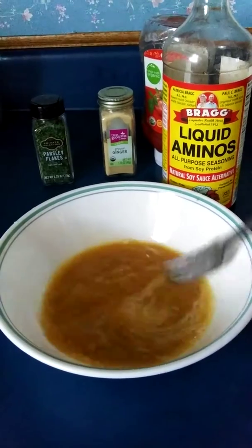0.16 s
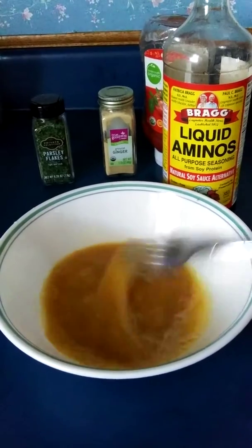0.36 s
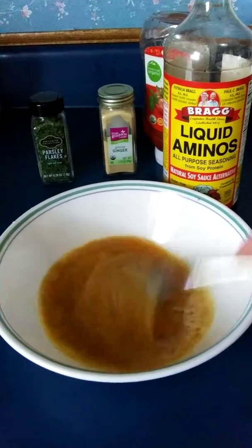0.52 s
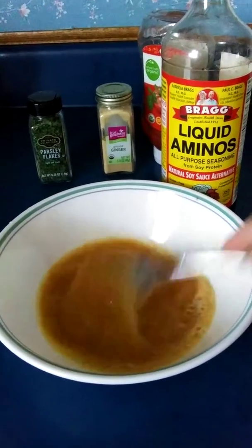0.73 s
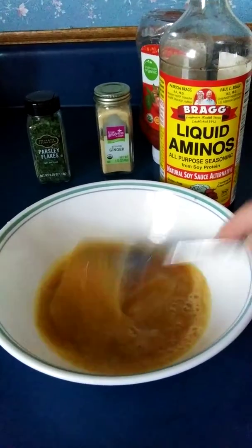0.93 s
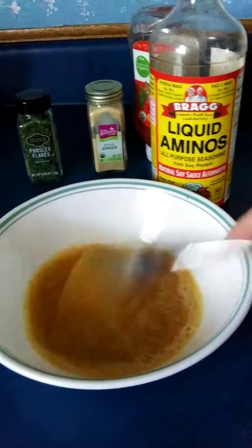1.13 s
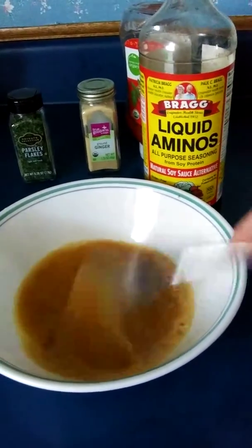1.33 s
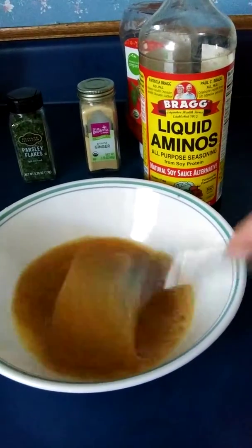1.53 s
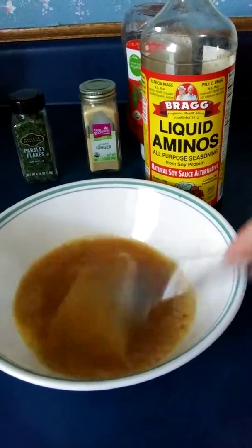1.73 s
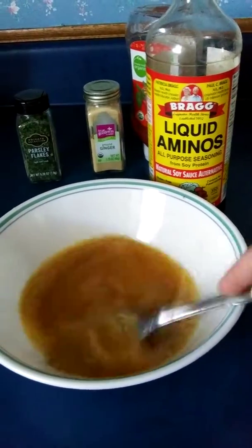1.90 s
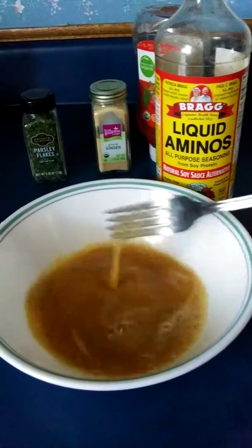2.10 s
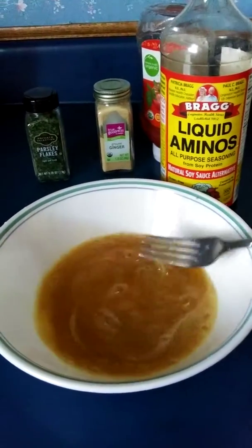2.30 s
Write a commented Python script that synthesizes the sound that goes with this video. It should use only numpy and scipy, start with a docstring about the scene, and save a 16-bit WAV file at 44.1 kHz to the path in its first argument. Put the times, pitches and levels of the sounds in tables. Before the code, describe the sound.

A steel fork beats eggs in a glass bowl, starting at about 0.2 seconds and striking five times a second. Each stroke is a bright clink with a short, slightly squeaky scrape and a light knock of the bowl on the counter. The egg sloshes faintly between strokes, with a few tiny plops. The last clink comes near 1.8 seconds, leaving quiet kitchen background after 2 seconds.

```python
"""Over a quiet kitchen background, a steel fork beats eggs in a glass bowl, five strokes a second.
The tines scrape over the glass and clink on it: glass and steel ring, and the bowl thumps the counter.
The tines chatter as they stick and slip, and touch the glass lightly around the strikes.
The egg sloshes back after each clink, a few bubbles plop, and once it gives a soft wet tick.
The small room adds a short tail."""
import sys
import numpy as np
from scipy import signal
from scipy.fft import rfft, irfft
from scipy.io import wavfile
from scipy.ndimage import map_coordinates

SR = 44100
rng = np.random.default_rng(int(sys.argv[2]) if len(sys.argv) > 2 else 0)


def unload_wav(signal):
    """Save mono or channel-first audio to the path in sys.argv[1] as 16-bit WAV at rate SR, clipped to [-1, 1]."""
    wavfile.write(
        sys.argv[1],
        SR,
        np.round(np.clip(np.atleast_2d(signal).T, -1, 1) * 32767).astype(np.int16),
    )


N = 103635

# Room background spectrum. Each row: frequency in Hz, level in dB.
BACKGROUND_SPECTRUM = [(100, -43.5), (190, -23.5), (236, -2.5), (335, -11), (416, -3), (734, -6),
                       (1790, -19.5), (5880, -26), (16000, -32)]
# Tine drags, and one soft wet tick of the egg at 1.796 s.
# Each row: start in seconds, length in seconds, level in dB, tilt in dB per octave.
SCRAPES = [(0.206, 0.085, -39, -1), (0.426, 0.061, -33.5, -1.5), (0.545, 0.022, -47.5, -5.5),
           (0.633, 0.041, -33, -2), (0.821, 0.045, -35, -2), (1.023, 0.039, -38, 0),
           (1.207, 0.082, -37.5, 0.5), (1.42, 0.05, -37, -2.5), (1.63, 0.085, -38.5, 0),
           (1.796, 0.0026, -47, -3), (1.827, 0.091, -36.5, -1.5)]
# Spectrum of steel rubbing glass. Each row: frequency in Hz, level in dB.
RASP_SPECTRUM = [(200, -41.5), (750, -12), (1150, 2.5), (2600, -4), (3900, -8.5), (6200, 1), (7400, 1.5),
                 (8800, -8), (10100, -4), (10800, -10), (11700, -2), (12800, -9.5), (16000, -12)]
# Fork strikes. Each row: start in seconds, ring level in dB, place (0 bottom, 1 slope, 2 low wall,
# 3 high wall), crack level in dB, crack tilt in dB per octave, thump level in dB.
CLINKS = [(0.2068, -25, 1.36, -25, 5.5, -35), (0.4205, -13, 0, -11.5, 0.5, -23.5),
          (.618, -17, 1.5, -16, 1, -24.5), (0.8149, -19, 3, -13, -2, -24.5), (1.015, -23.5, 2, -19, 1, -28),
          (1.206, -19, 0.72, -12.5, -1, -26.5), (1.4188, -20, 0.5, -14, 0, -28),
          (1.625, -16.5, 1.18, -15.5, 0.5, -27), (1.8312, -19, 1, -16, 4.5, -27.5)]
# Ringing modes of bowl and fork: glass below 5 kHz, steel tines above.
# Each row: frequency in Hz, T60 in seconds, level in dB at places 0 to 3.
CLINK_MODES = [(1000, 0.086, -15, -16.5, -26, -30.5), (1136, 0.065, -11, -8.5, -15.5, -21),
               (1238.3, .08, -20.5, -10.5, -3, -5.5), (1330.5, 0.041, -24.5, -5.5, -9, -7),
               (1567, 0.1, -13.5, -18.5, -7, -22.5), (2023, 0.073, -9.5, -16, -14, -37),
               (2132, 0.1, -19.5, -9, -23.5, -18), (2320, 0.037, -10, -13, -9, -31.5),
               (2507, 0.06, -3.5, -3.5, -15.5, -13.5), (2636, 0.044, 3, -5.5, -1, -16),
               (2862, 0.041, -8.5, -22, -8, -7.5), (3236, 0.06, -9.5, -11, -18.5, -16),
               (3470, 0.034, 2.5, -13, -1, -17), (3620, 0.052, -3, -34.5, -16.5, -31.5),
               (4614, .03, -21.5, -10, -2.5, -32), (5933, 0.0076, 8, 8, -10.5, 7.5),
               (6180, 0.018, -3.5, 2.5, 5.5, 3.5), (6730, 0.038, -17, -14, -11.5, -6.5),
               (7165, 0.045, -11.5, -2.5, -15, 6), (7810, 0.094, -12, -32, 1, -21)]
# Tine crack. Each row: frequency in Hz, level in dB on bottom and slope, level in dB on the high wall.
CRACK_SPECTRA = [(178.6, -44, -34), (800, -21, -19), (1180, -13, -14), (2670, -3.5, -12.5),
                 (3900, -5, -2.5), (4510, -2.5, -0.5), (5400, -6.5, -2), (6030, 8.5, -4.5), (6590, -1.5, 6),
                 (6850, -12, 1), (8600, -8.5, -11), (10600, -13, -12.5), (11100, -18.5, -17),
                 (12160, -3, -4), (12440, -16, -11.5), (16000, -10.5, -24.5)]
# Bowl on the counter. Each row: frequency in Hz, T60 in seconds, level in dB.
THUMP_MODES = [(386.7, 0.054, 0), (419.3, 0.038, -8)]
# Stick-slip bursts. Each row: start in seconds, length in seconds, pitch in Hz, level in dB.
CHATTERS = [(0.213, 0.045, 6090, -35.5), (0.2735, 0.0043, 6570, -29), (0.283, 0.0028, 6500, -33),
            (1.279, 0.0058, 5870, -34), (1.479, 0.012, 6300, -40.5), (1.686, 0.015, 5684, -33),
            (1.893, 0.0092, 6390, -33), (1.905, 0.0078, 5830, -33)]
# Light tine contacts. Each row: start in seconds, level in dB.
TOUCHES = [(0.2754, -32.5), (.415, -34), (.604, -35), (0.606, -28.5), (1.002, -37.5), (1.007, -38),
           (1.2, -34), (1.2773, -37.5), (1.4096, -27.5), (1.4833, -33.5), (1.601, -45), (1.6173, -36),
           (1.6185, -30.5), (1.6832, -36), (1.8208, -27.5)]
# Spectrum of moving egg. Each row: frequency in Hz, level in dB.
EGG_SPECTRUM = [(30, -47), (500, -1.5), (1000, 0), (2000, -11.5), (15000, -31)]
# Egg bubbles. Each row: start in seconds, level in dB, starting pitch in Hz.
PLOPS = [(0.554, -42.5, 1160), (.729, -47, 1110), (1.772, -41, 820), (1.79, -43.5, 610), (2.036, -45, 1557)]
# Room tail decay. Each row: frequency in Hz, T60 in seconds.
ROOM_DECAY = [(100, 0.24), (400, 0.44), (1200, 0.26), (7000, 0.29), (15000, 0.14)]
# Room tail spectrum. Each row: frequency in Hz, level in dB.
ROOM_SPECTRUM = [(100, -6), (400, -1), (3000, 0), (7000, -6), (15000, 1.5)]

BACKGROUND_DB = -59.5
SCRAPE_FADE_DB_PER_S, SNAGS_PER_S, SNAG_DB = 58, 150, 19.5
PATCH_DB, PATCH_HZ, PATCH_S = 6, 352.8, 0.02  # depth, width and life of the rasp's resonances
SQUEAK_HZ, SQUEAK_DB, SQUEAK_WANDER_FRACTION = 6130, -11, 0.054
DETUNE_FRACTIONS = (0.003, 0.008)  # glass, steel
CRACK_T60_S, BUZZ_T60_S, BUZZ_DB = 0.0062, 0.061, -8.5
SLOSH_DB, SLOSH_LAG_S, SLOSH_WIDTH_S = -64.5, 0.13, 0.023
PLOP_T60_S, PLOP_RISE_PER_S = 0.057, 1.2
WET_DB, WALL_DELAY_S = -10, 0.005
LOWPASS_HZ = 15880
T = np.arange(SR // 4) / SR  # seconds within one event


def amp(db):
    """Decibels to gain."""
    return 10 ** (np.asarray(db) / 20)


def unit(x):
    """Scale to rms 1."""
    return x / np.sqrt(np.mean(x ** 2) + 1e-20)


def along(points, hz):
    """Interpolate (Hz, value) points on a log axis."""
    point_hz, values = np.transpose(points)
    return np.interp(np.log(hz + 1), np.log(point_hz + 1), values)


def rise(attack_s):
    """Exponential onset."""
    return 1 - np.exp(-T / attack_s)


def fade(t60_s):
    """Exponential decay."""
    return np.exp(-np.log(1000) * T / t60_s)


def gate(length_s, attack_s, release_s):
    """Attack, hold and release."""
    return rise(attack_s) * np.exp(-np.maximum(T - length_s, 0) / release_s)


def wobble(knots_per_s, size=len(T)):
    """Smooth random curve."""
    return map_coordinates(rng.standard_normal(4096), [np.arange(size) * knots_per_s / SR], mode="wrap")


def bin_gains(size, spectrum, tilt_db_oct):
    """FFT gains of a spectrum, tilted above about 1 kHz."""
    hz = np.fft.rfftfreq(size, 1 / SR)
    return amp(along(spectrum, hz) + tilt_db_oct * np.log2(1 + hz / 1000))


def colour(x, spectrum, tilt_db_oct=0):
    """Zero-phase filter, output at rms 1."""
    return unit(irfft(rfft(x) * bin_gains(len(x), spectrum, tilt_db_oct), len(x)))


def causal_colour(x, spectrum, tilt_db_oct):
    """Minimum-phase filter, output at rms 1."""
    size = len(x)
    cepstrum = irfft(np.log(unit(bin_gains(size, spectrum, tilt_db_oct))), size)
    cepstrum[1:size // 2] *= 2
    cepstrum[size // 2:] = 0
    return unit(irfft(rfft(x) * np.exp(rfft(cepstrum)), size))


def add(out, start_s, x):
    """Mix x into out."""
    i = max(round(start_s * SR), 0)
    out[i:i + len(x)] += x[:max(N - i, 0)]


def background():
    """Steady low room noise."""
    return amp(BACKGROUND_DB) * colour(rng.standard_normal(N), BACKGROUND_SPECTRUM)


def moving_contact(x):
    """Narrow treble resonances shift at random as the contact point moves."""
    hz, t, bins = signal.stft(x, SR, nperseg=256)
    grid = np.meshgrid(hz / PATCH_HZ, t / PATCH_S, indexing="ij")
    patches = np.tanh(map_coordinates(rng.standard_normal((256, 256)), grid, mode="wrap"))
    depth_db = PATCH_DB * np.minimum(hz / 5000, 1)[:, None]
    return unit(signal.istft(bins * amp(depth_db * patches), nperseg=256)[1][:len(x)])


def squeak():
    """A tine sings in brief, wandering bursts, with its octave."""
    hz = SQUEAK_HZ * (1 + SQUEAK_WANDER_FRACTION * np.tanh(wobble(70)))
    phase = 2 * np.pi * np.cumsum(hz) / SR
    bursts = np.clip(wobble(160.7), 0, 1)
    return unit(bursts * (np.sin(phase) + np.sin(2 * phase) / 2))


def scrapes():
    """Tines drag over the glass in uneven slips and snags; the shortest burst is the egg's wet tick."""
    out = np.zeros(N)
    for start_s, length_s, db, tilt_db_oct in SCRAPES:
        snags = amp(SNAG_DB) * (rng.random(len(T)) < SNAGS_PER_S / SR)
        friction = moving_contact(rng.standard_normal(len(T)) + snags)
        slips = amp(5.5 * np.tanh(wobble(600)))
        rasp = colour(friction * slips, RASP_SPECTRUM, tilt_db_oct)
        pressure = amp(db - SCRAPE_FADE_DB_PER_S * T) * gate(length_s, attack_s=0.0019, release_s=0.013)
        add(out, start_s, kitchen(pressure * (rasp + amp(SQUEAK_DB) * squeak())))
    return out


def clink_ring(place, scatter_db=2.5):
    """Glass and tine modes, weighted by strike place; moving egg and grip detune them on each blow."""
    out = np.zeros(len(T))
    for k, (hz, t60_s, *place_db) in enumerate(CLINK_MODES):
        db = np.interp(place, np.arange(len(place_db)), place_db) + scatter_db * rng.normal()
        detune = 1 + DETUNE_FRACTIONS[int(hz > 5000)] * rng.normal()
        out += (-1) ** k * amp(db) * fade(t60_s) * np.sin(2 * np.pi * hz * detune * T)
    return out


def crack(place, tilt_db_oct):
    """Bright snap of steel on glass, then a short tine buzz."""
    wall_share = np.clip((place - 1) / 2, 0, 1)
    spectrum = [(hz, db + wall_share * (wall_db - db)) for hz, db, wall_db in CRACK_SPECTRA]
    envelope = fade(CRACK_T60_S) + amp(BUZZ_DB) * fade(BUZZ_T60_S)
    snap = causal_colour(rng.standard_normal(len(T)) * envelope, spectrum, tilt_db_oct)
    return snap * np.sqrt(np.mean(envelope ** 2))


def clinks():
    """Tines strike with a crack; bowl and fork ring, and the bowl thumps the counter."""
    out = np.zeros(N)
    thump = sum(amp(db) * fade(t60_s) * np.sin(2 * np.pi * hz * T) for hz, t60_s, db in THUMP_MODES)
    thump *= rise(0.0036)
    for start_s, ring_db, place, crack_db, tilt_db_oct, thump_db in CLINKS:
        ring = amp(ring_db - 1.5) * clink_ring(place) * rise(0.0005)
        snap = amp(crack_db) * crack(place, tilt_db_oct)
        add(out, start_s, kitchen(ring + snap + amp(thump_db) * thump))
    return out


def chatters():
    """A tine sticks and slips: a rough squeak with its octave."""
    out = np.zeros(N)
    for start_s, length_s, hz, db in CHATTERS:
        phase = 2 * np.pi * np.cumsum(hz * (1 + 0.026 * np.tanh(wobble(2000)))) / SR
        grit = colour(moving_contact(rng.standard_normal(len(T))), RASP_SPECTRUM, tilt_db_oct=2.5)
        tone = np.sin(phase) + amp(-6.5) * np.sin(2 * phase) + amp(-1) * grit
        roughness = amp(6 * np.tanh(wobble(700)))
        envelope = amp(db) * gate(length_s, attack_s=0.00078, release_s=0.0039)
        add(out, start_s, kitchen(envelope * unit(tone * roughness)))
    return out


def touches():
    """Tines tap lightly: a duller crack and a faint ring."""
    out = np.zeros(N)
    for start_s, db in TOUCHES:
        tap = crack(place=1.6, tilt_db_oct=-6) + amp(-8) * clink_ring(place=1)
        add(out, start_s, kitchen(amp(db) * tap))
    return out


def slosh():
    """Wet crackle that swells as the egg falls back after each clink."""
    t = np.arange(N) / SR
    swells = sum(np.exp(-((t - clink_s - SLOSH_LAG_S) / SLOSH_WIDTH_S) ** 2) for clink_s, *_ in CLINKS)
    crackle = rng.standard_normal(N) * amp(2.43 * wobble(300, N))
    return amp(SLOSH_DB) * (amp(1.5) + swells) * colour(crackle, EGG_SPECTRUM)


def plops():
    """Bubbles in the egg ring with rising pitch and a small splash."""
    out = np.zeros(N)
    for start_s, db, hz in PLOPS:
        bubble = np.sin(2 * np.pi * hz * (T + PLOP_RISE_PER_S * T ** 2 / 2))
        splash = amp(-4.5) * colour(rng.standard_normal(len(T)), EGG_SPECTRUM)
        add(out, start_s, amp(db) * (bubble + splash) * fade(PLOP_T60_S) * rise(0.00099))
    return out


def kitchen(x):
    """Direct sound plus a fresh diffuse tail from the walls."""
    hz, t, bins = signal.stft(rng.standard_normal(SR // 2), SR, nperseg=256)
    decay = np.exp(-np.log(1000) * t / along(ROOM_DECAY, hz)[:, None])
    tail = signal.istft(bins * decay * amp(along(ROOM_SPECTRUM, hz))[:, None], SR, nperseg=256)[1]
    response = np.pad(amp(WET_DB) * tail / np.linalg.norm(tail), (round(WALL_DELAY_S * SR), 0))
    response[0] = 1  # direct path
    return signal.fftconvolve(x, response)


def scene():
    """Background, fork and egg, in mono."""
    room_noise = background()
    fork = clinks() + touches() + scrapes() + chatters()
    egg = kitchen(slosh() + plops())[:N]
    return (room_noise + fork + egg)[None]


def record(dry):
    """Linear-phase low-pass."""
    taps = signal.firwin(255, LOWPASS_HZ, fs=SR, window="blackman")
    return signal.fftconvolve(dry, taps[None], mode="same")


dry = scene()
out = record(dry)
unload_wav(out)
```